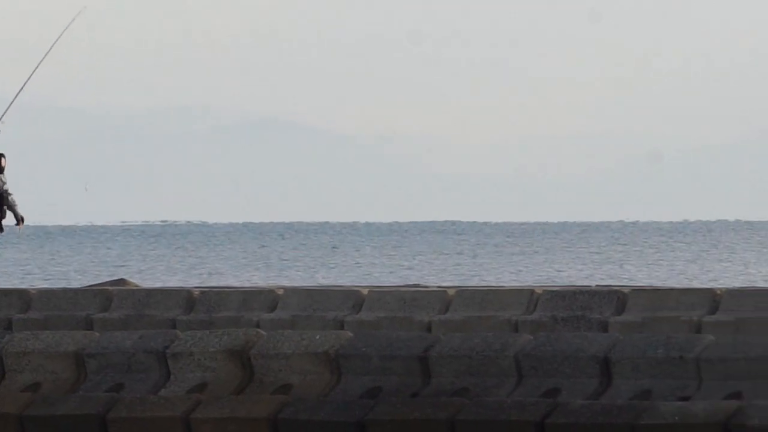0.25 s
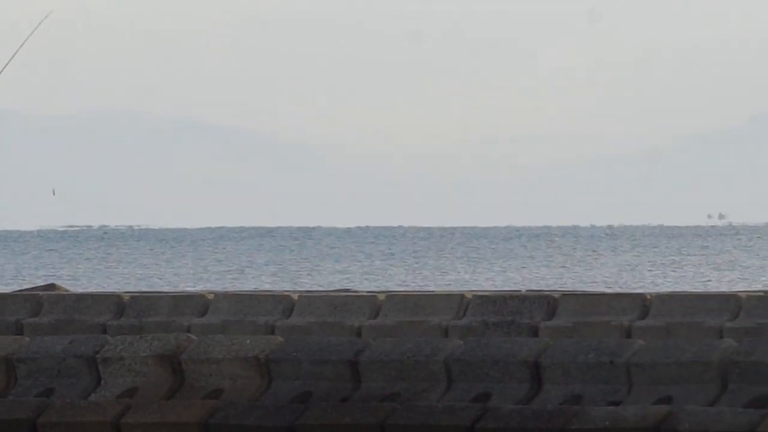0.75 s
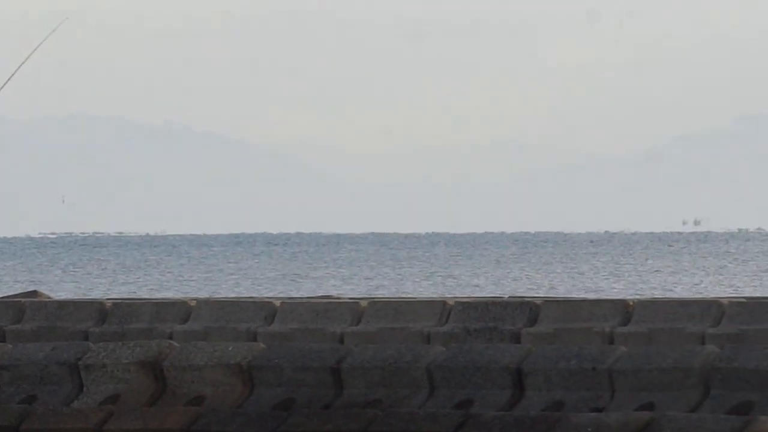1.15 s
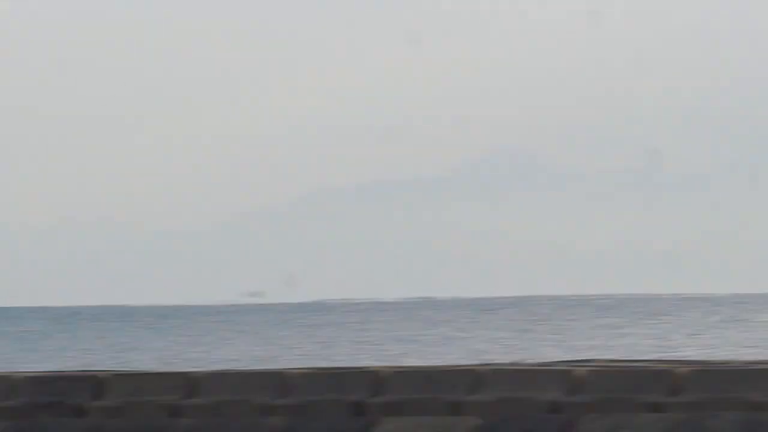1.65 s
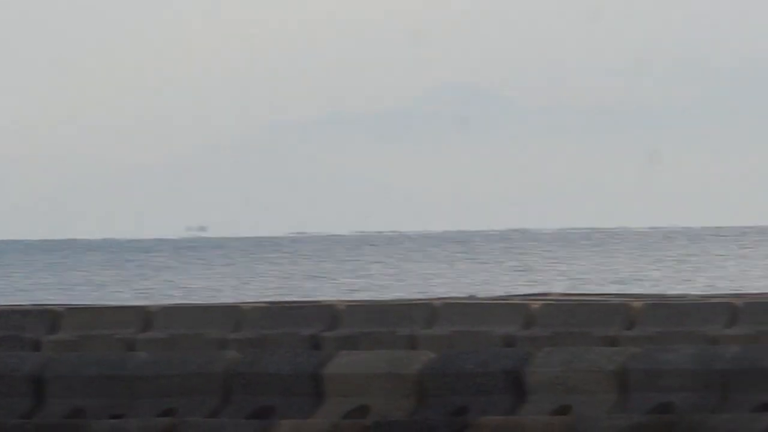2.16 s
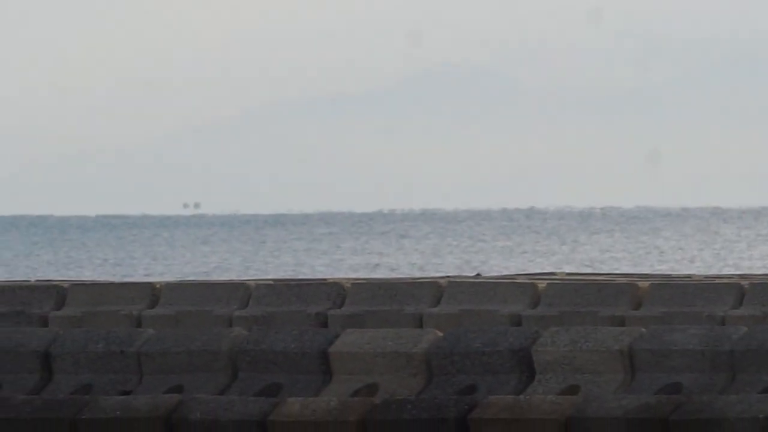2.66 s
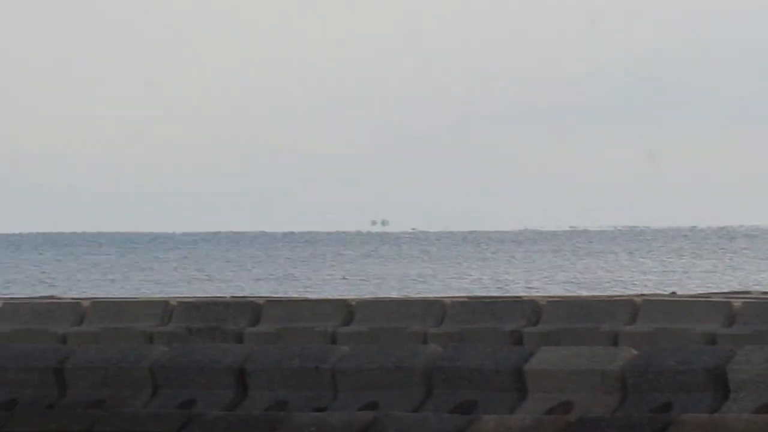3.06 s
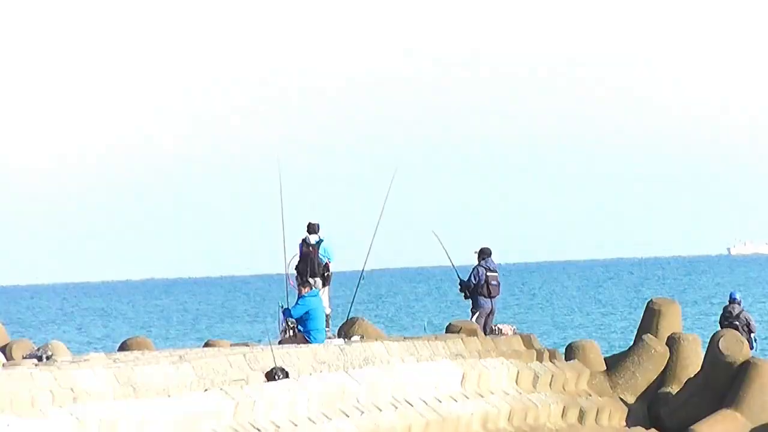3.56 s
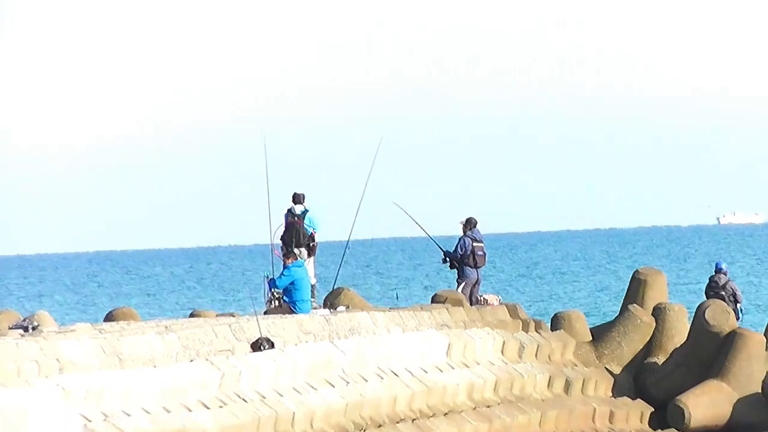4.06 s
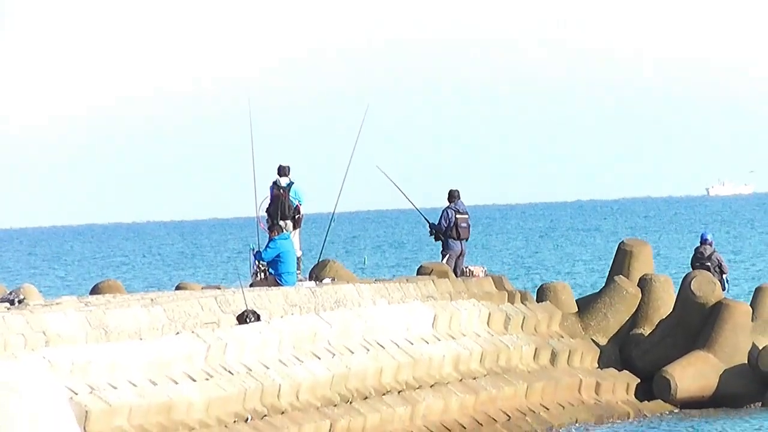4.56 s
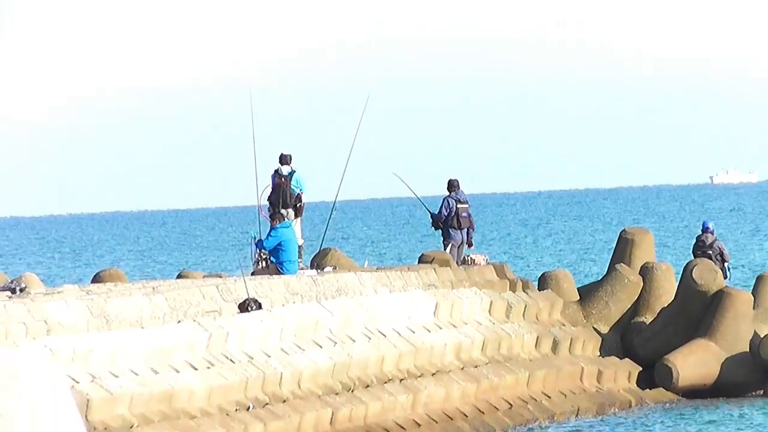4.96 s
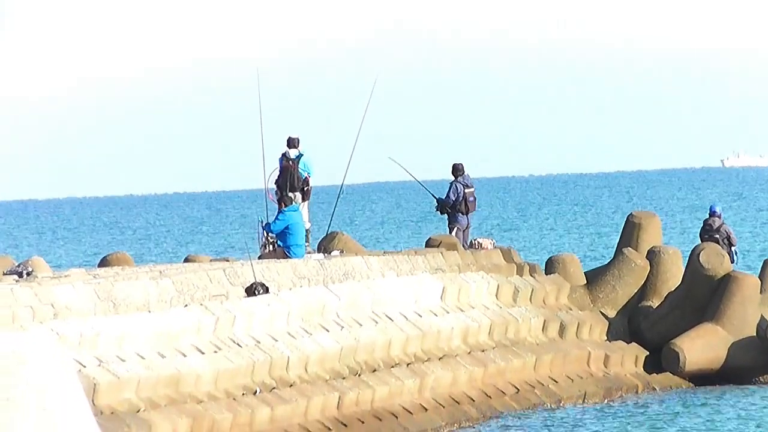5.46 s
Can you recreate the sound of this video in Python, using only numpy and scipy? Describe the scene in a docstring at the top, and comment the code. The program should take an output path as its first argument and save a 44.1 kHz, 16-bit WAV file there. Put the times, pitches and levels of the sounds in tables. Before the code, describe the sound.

Small sea waves slosh among the blocks of a concrete breakwater a few metres from the microphone, with hollow gulps, bubbling, fizzing foam and drops spattering on the concrete. The water shifts slightly to the right and grows fizzier. It cuts off into a brief silence, then the sea returns from farther off, straight ahead, as a softer, duller wash with faint gurgles.

```python
"""Small sea waves slosh among the blocks of a concrete breakwater, a few metres from the microphone.
Countless bubbles make the rush and bursting foam the fizz; trapped air gulps, flung drops crackle
on the concrete and hollows sing as they fill and drain. After a short silence the water is heard
from farther off: a softer, duller rush from straight ahead, with a thin fizz of foam."""
import sys
import numpy as np
from scipy import signal
from scipy.fft import rfft, irfft
from scipy.io import wavfile

SR = 44100
rng = np.random.default_rng(int(sys.argv[2]) if len(sys.argv) > 2 else 0)


def master(y):
    """Save y as 16-bit WAV."""
    cut = np.clip(np.atleast_2d(y).T, -1, 1)
    pcm = np.round(cut * 32767)  # scale
    wavfile.write(sys.argv[1], SR, pcm.astype(np.int16))


N = 251370
TIME = np.arange(N) / SR
CUTOFF_HZ = 11000
BANDS_PER_OCTAVE = 4
BAND_HZ = 25 * 2 ** (np.arange(30) / BANDS_PER_OCTAVE)


def from_db(db):
    """Decibels to gain."""
    return 10 ** (np.asarray(db) / 20)


def unit_rms(x):
    """Scale to unit rms."""
    return x / np.sqrt(np.mean(x ** 2) + 1e-20)


def in_time(rows):
    """Each column of a curve at every sample."""
    s, *columns = np.transpose(rows)
    return np.array([np.interp(TIME, s, c) for c in columns])


def at_hz(points, hz):
    """Read a table on a log-frequency axis."""
    point_hz, values = np.transpose(points)
    return np.interp(np.log(hz), np.log(point_hz), values)


def drift(rate):
    """A smooth random wander of unit rms, changing at about the given rate in Hz."""
    step, settle = 40, 2000
    pole = np.exp(-2 * np.pi * rate * step / SR)
    white = rng.standard_normal(N // step + settle + 2)
    slow = signal.lfilter([1], [1, -2 * pole, pole * pole], white)[settle:]
    return np.interp(np.arange(N) / step, np.arange(len(slow)), unit_rms(slow))


def pan(balance_db):
    """Left and right gains of constant power; balance is left over right."""
    gains = from_db(np.array([[.5], [-.5]]) * balance_db)
    return gains / np.sqrt(np.mean(gains ** 2, axis=0))


def add(out, s, sound, balance_db, lag_ms):
    """Place a short sound in stereo, reaching the left microphone lag_ms late."""
    for side, gain, start in zip(out, pan(balance_db), (s + lag_ms / 1000, s)):
        i = int(np.clip(start * SR, 0, N))
        side[i:i + len(sound)] += gain * sound[:N - i]


def dulled(x, top_hz):
    """Steep loss of treble."""
    return signal.sosfilt(signal.butter(8, min(top_hz, CUTOFF_HZ), fs=SR, output="sos"), x)


def wash(waves, lull):
    """Levels in dB of water and foam: each wave builds, froths abruptly as it breaks, then drains."""
    onset_s, foam_build, foam_drain = .008, 0.6, 1.07   # build and drain set the foam's steepness
    power = from_db(lull)[:, None] ** 2
    for crest, breaks, rise, fall, *crest_db in waves:
        early = np.maximum(crest - TIME, 0) / rise
        late = np.maximum(TIME - crest, 0) / fall
        unbroken = np.maximum(breaks - TIME, 0) / onset_s
        water = np.exp(-np.minimum(early ** 2 + late, 20))
        froth = np.exp(-np.minimum(unbroken + foam_build * early ** 4 + foam_drain * late, 20))
        shapes = np.array([water, water] + [froth] * (len(crest_db) - 2))
        power = power + (from_db(crest_db)[:, None] * shapes) ** 2
    return 10 * np.log10(power)


# The centres of slosh, rush and splash, in Hz.
WASH_HZ = [520, 1150, 2370]
def band_levels(slosh_db, rush_db, fizz_db, colour, level_db, usual_fizz_db):
    """Rms of each band in time: the water's colour, bent by slosh and rush; foam brightens the splash."""
    splash_db = 0.73 * rush_db + 0.16 * (fizz_db - usual_fizz_db)
    shares = np.array([np.interp(np.log(BAND_HZ), np.log(WASH_HZ), row) for row in np.eye(3)])
    swell = from_db(level_db + shares.T @ [slosh_db, rush_db, splash_db])
    steady = from_db(at_hz(colour, BAND_HZ)) * np.sqrt(BAND_HZ)
    return swell * (steady / np.linalg.norm(steady))[:, None]


def churn(levels, likeness, balance_db, slosh_lead_ms, rush_lag_ms,
          surge_db, patchy_db, surge_hz, patchy_hz):
    """Countless tiny bubbles merge into a rush that surges as a whole and in patches an octave wide."""
    out, white = np.zeros((2, N)), rng.standard_normal((2, 2, N))
    surge = surge_db * drift(surge_hz)
    for k, hz in enumerate(BAND_HZ):
        if k % BANDS_PER_OCTAVE == 0:
            shadow = hz / (hz + 180)   # low sound bends round the microphone to both sides alike
            lumps = unit_rms(from_db(surge + patchy_db * drift(patchy_hz))) * pan(shadow * balance_db)
        edges = hz * 2 ** (np.array([-.5, .5]) / BANDS_PER_OCTAVE)
        band = signal.butter(2, edges, "band", fs=SR, output="sos")
        mid, side = unit_rms(signal.sosfilt(band, white[k % 2]))
        alike = at_hz(likeness, hz)
        mid, side = mid * np.sqrt((1 + alike) / 2), side * np.sqrt((1 - alike) / 2)
        lead_ms = slosh_lead_ms if hz < 900 else -rush_lag_ms
        left = np.interp(TIME + lead_ms / 1000, TIME, mid + side)
        out += levels[k] * lumps * np.array([left, mid - side])
    return out


def bubble(hz, cycles, rise):
    """A pocket of air rings briefly, its pitch climbing as it nears the surface."""
    age = np.arange(int(6 * cycles / hz * SR)) * hz / (cycles * SR)   # in decay times
    swell = (1 - np.exp(-age / .22)) ** 2 * np.exp(-age)
    return swell / swell.max() * np.sin(2 * np.pi * cycles * (age + rise * age ** 2 / 2))


def bubbling(levels, level_db, spread_db, cycles, balance_db, scatter_db, lag_ms, count):
    """Single bubbles stand out of the rush, as strong as the wash is at their pitch; a few are louder."""
    out = np.zeros((2, N))
    for when, pitch, size, life, place in rng.random((count, 5)):
        i, hz = int(when * N), 230 * (3000 / 230) ** pitch
        strength = levels[np.argmin(abs(np.log(BAND_HZ / hz))), i]
        size_db = level_db + spread_db * min(-np.log(1 - size), 3)
        ring = strength * from_db(size_db) * bubble(hz, cycles * 2 ** (2 * life - 1), rise=0.053)
        # all start within the first second, with level and balance drawn from the whole wash
        add(out, when, ring, balance_db[i] + scatter_db * (2 * place - 1), 2 * place * lag_ms)
    return out


def foam(swell_db, colour, level_db, pops_per_s, spread_db, clump_db, side_db):
    """Foam fizzes as its tiny bubbles burst in clumps."""
    born = rng.random((2, N)) < pops_per_s / SR
    sizes = from_db(spread_db * np.minimum(rng.exponential(1, (2, N)), 4))
    pops = born * sizes * rng.choice([-1, 1], (2, N)) * from_db(clump_db * drift(26))
    hz = np.maximum(np.fft.rfftfreq(N, 1 / SR), 1)
    mid, side = irfft(rfft(pops) * from_db(at_hz(colour, hz)), N)
    side = side * from_db(side_db)
    return from_db(level_db + swell_db) * unit_rms(np.array([mid + side, mid - side]))


# Waves running into the blocks close by. Each row: crest, break, rise and fall in seconds,
# then relative levels of slosh, rush, fizz and spray at the crest in dB.
NEAR_WAVES = [(.2, 0.108, 0.066, 0.073, -1.5, 3, -67, -73), (.44, 0.42, 0.038, 0.089, 4.5, 1, -65, -72),
              (.59, .56, 0.053, 0.41, 5, -14, -85.5, -108), (.98, 0.99, 0.054, 1, 1.5, -6, -73.5, -108),
              (1.47, 1.45, 0.14, 0.14, 1.5, -1, -61, -91.5), (1.72, 1.55, 0.18, 0.76, 0.5, -1.5, -62, -90),
              (2.12, 2.08, 0.17, 0.62, -3.5, -3, -61.5, -84.5),
              (2.42, 2.21, 0.12, 0.15, -3.5, 1.5, -54.5, -65),
              (2.56, 2.525, 0.042, 0.16, -7, 3.5, -47.5, -60),
              (2.84, 2.87, 0.058, 0.28, -7.5, -0.5, -58.5, -95.5),
              (3.25, 2.98, 0.16, 0.28, -13, -1.5, -60.5, -78),
              (3.45, 3.41, 0.055, 0.4, -8, -6.5, -56, -70.5)]
# Between waves: the same four levels in dB.
NEAR_LULL = (-9, -3.5, -77, -114)
# Water, foam and fine spray at close range. Each row: frequency in Hz, relative density in dB.
NEAR_COLOUR = [(25, -29), (100, -24.5), (170, -16.5), (250, -13.5), (400, -5), (570, 0.5), (900, -4.5),
               (1250, -3), (1700, -8), (2500, -9), (3200, -16), (3800, -12.5)]
NEAR_FOAM_COLOUR = [(2600, -19.5), (3600, 2.5), (4100, 1.5), (4700, -2.5), (5300, -6), (6000, -30.5),
                    (7500, -41.5), (11000, -56)]
SPRAY_COLOUR = [(4500, -16.5), (5700, -1.5), (7400, -5), (8400, -17.5), (9500, -26.5), (10500, -47)]
# Stereo image beside the blocks. Each row: frequency in Hz, left-right likeness from 0 to 1.
NEAR_LIKENESS = [(60, 0.3), (300, 0.6), (600, 0.45), (1200, 0.9), (2200, 0.6), (3500, 0.72)]
# Where the water lies. Each row: time in seconds, balance in dB, slosh's lead at the left in ms.
BEARING = [(0, -2, 0.86), (.9, -2, 0.78), (1.3, -4.5, 0.89), (1.7, -3.5, 0.83), (2.1, -3.5, 0.24),
           (2.5, -5.5, 0.15), (3.5, -6, 0)]
RUSH_LAG_MS = 0.12   # the rush lies to the right and reaches the left microphone late
def near_water():
    """Waves work among the blocks a few metres from the microphone, moving over to the right."""
    slosh_db, rush_db, fizz_db, spray_db = wash(NEAR_WAVES, NEAR_LULL)
    levels = band_levels(slosh_db, rush_db, fizz_db, NEAR_COLOUR, level_db=-41.5, usual_fizz_db=-60.5)
    balance_db, slosh_lead_ms = in_time(BEARING)
    rush = churn(levels, NEAR_LIKENESS, balance_db, slosh_lead_ms, RUSH_LAG_MS,
                 surge_db=1.0, patchy_db=1.78, surge_hz=22, patchy_hz=120)
    bubbles = bubbling(levels, level_db=3.5, spread_db=2.0, cycles=1.93,
                       balance_db=balance_db, scatter_db=12.5, lag_ms=RUSH_LAG_MS, count=2000)
    fizz = foam(fizz_db, NEAR_FOAM_COLOUR, level_db=-6.0, pops_per_s=4100,
                spread_db=0.0, clump_db=3.0, side_db=3.0)
    spray = foam(spray_db, SPRAY_COLOUR, level_db=-2.0, pops_per_s=1600,
                 spread_db=0.5, clump_db=4.0, side_db=1.0)
    spray_pan = pan(15 + 2 * balance_db)   # flies up left of the wash and swings twice as far
    return dulled(rush + bubbles, top_hz=3270) + fizz + spray * spray_pan


# Large air pockets, close by and then far off. Each row: start in seconds, pitch in Hz, peak in dB,
# decay time in cycles, balance in dB, lead at the left microphone in ms.
GULPS = [(0.103, 636, -29, 1.1, 1, 0.7), (.135, 1500, -33.5, 4.3, -3, -0.063),
         (.183, 520, -34.5, 3, -10, 0.47), (.208, 760, -32, 4, -6, 0.41), (.217, 960, -34, 1.2, -3, .2),
         (0.2466, 2220, -30.5, 3.8, 3, 0.081), (.2762, 590, -26.5, 2.2, -7.5, 0.68),
         (.314, 634, -30.5, 2.2, -3, 0.4), (.43, 721, -30, 1.5, -2, 0.64), (0.466, 520, -25, 1.3, 4, 0.7),
         (.489, 637, -30.5, 2.4, -1, 0.37), (0.5727, 760, -24.5, 1.35, -6, 0.45),
         (0.5951, 670, -26, 1.1, 6.5, 0.69), (.6124, 1180, -38, 3.3, 1, -.08),
         (.624, 550, -31, 2.2, -4, 0.33), (.631, 1270, -39, 5.4, 0.5, 0.013),
         (.679, 1480, -44, 6, -4, -.07), (0.7017, 620, -31, 2.6, 3, 0.34), (0.7542, 535, -37, 1.4, 3, 0.33),
         (.793, 673, -36, 1.9, -2, 0.35), (0.8214, 690, -25, 1.07, -6, 0.38),
         (0.876, 1360, -48, 4, -4, -0.23), (.944, 625, -33, 1.6, -7, .49),
         (.968, 1375, -34, 2.4, -6, 0.038), (.995, 1270, -43, 6.4, -2.5, -0.12),
         (1.096, 1030, -42, 7.9, 0, 0.14), (1.118, 1260, -42, 5, -3, -.1), (1.133, 494, -40.5, 5, -6, 0.25),
         (1.445, 700, -34.5, 1.8, -10, 0.33), (1.461, 338, -39, 1.8, -8, .4),
         (1.51, 674, -32, 2.3, 9, 0.39), (1.736, 1070, -29.5, 1.9, -4, 0.22),
         (1.7995, 625, -31, 1.7, 5, 0.46), (1.826, 1040, -38, 4, -2, -0.16),
         (1.972, 1847, -36, 4.3, -8, 0.12), (2.104, 760, -39, 3.5, -4, 0.055),
         (2.491, 637, -31.5, 4.1, -6, -0.14), (2.563, 762, -31.5, 3.6, -5, 0),
         (2.718, 1150, -32.5, 3.2, -7, -0.02), (2.8122, 980, -37.5, 3.2, -7, -0.13),
         (3.266, 1010, -36.5, 3.1, -6, -.05), (4.019, 597, -41.5, 1.7, 0.5, 0),
         (4.371, 704, -42, 2.1, 0.5, 0.086), (4.653, 288, -52, 1.2, -2, 0), (4.711, 1060, -43, 3.1, 3, 0),
         (4.946, 726, -46, 1.9, 1, 0), (4.996, 725, -37, 1.5, 1, 0.091),
         (5.002, 500, -42.5, 1.9, -1, 0.052), (5.005, 264, -56.5, 1.6, 0, -0.076),
         (5.092, 464, -42, 0.92, 0, 0.046), (5.146, 596, -40, 2.7, 1, 0),
         (5.255, 570, -48, 3.2, 0.5, 0.033), (5.283, 367, -47, 1.6, -1, 0),
         (5.328, 230, -48.5, 1.3, 0.5, 0), (5.336, 790, -40, 2.7, 2, 0), (5.47, 512, -39, 2.5, -1, -0.022),
         (5.568, 636, -42, 3.3, 0, 0.12), (5.584, 680, -41, 3.3, -1, 0)]
def gulps():
    """Water closes over big pockets of air between the blocks."""
    out, rise_per_cycle = np.zeros((2, N)), 0.022
    for s, hz, peak_db, cycles, balance_db, lead_ms in GULPS:
        add(out, s, from_db(peak_db) * bubble(hz, cycles, rise_per_cycle * cycles), balance_db, -lead_ms)
    return out


# Drops landing on the breakwater, and at 3.7504 s a short sharp tick as the far scene begins. Each row: start
# in seconds, level in dB, length in seconds, # band bottom and top in Hz, balance in dB, lag at the left
# microphone in ms.
SPLATS = [(0.194, -67, 0.0064, 4500, 7050, 6, 0), (0.422, -72, 0.0082, 5500, 7600, 10, 0.0061),
          (0.527, -75, .005, 5000, 6900, 11, 0.024), (0.727, -83.5, 0.011, 4000, 5560, -3, 0.039),
          (1.026, -67, 0.0051, 4000, 5700, 10, 0.024), (1.397, -57, 0.016, 2400, 4230, 0, 0.045),
          (1.447, -50.5, 0.0027, 2600, 4200, -2, 0.057), (1.5066, -39, 0.014, 704, 3720, -2, 0.088),
          (1.5127, -38.5, 0.0034, 800, 4700, 12, 0.066), (1.518, -68, 0.046, 4480, 7500, 6, .05),
          (1.5367, -33, 0.0018, 1670, 5420, 14, 0.029), (1.736, -41.5, 0.0022, 1200, 3050, 9, 0.051),
          (1.7935, -70, .004, 5000, 7370, 7, 0.043), (2.433, -58, 0.0077, 3000, 6100, -10, 0.14),
          (2.46, -57.5, 0.013, 3000, 6560, -11, .12), (2.478, -45.5, 0.0077, 2820, 5770, -5, 0.13),
          (2.7178, -35, 0.0035, 700, 5260, -7, .095), (2.7562, -36, 0.0026, 700, 5760, -7, 0.071),
          (2.837, -41.5, 0.0035, 1840, 4900, -6, 0.15), (2.963, -60, 0.0039, 3850, 5540, -28, .12),
          (3.063, -43.5, 0.0027, 1280, 4100, -3, 0.045), (3.086, -36, 0.0024, 700, 3900, -2.5, 0.067),
          (3.4108, -56.5, 0.0019, 5250, 8500, -11, 0.091), (3.431, -31.5, 0.0019, 1910, 3140, -1, 0.063),
          (3.7504, -52, .0012, 3580, 5060, -1, 0.0032), (4.337, -71, 0.014, 4000, 5000, 2, 0),
          (4.656, -60.5, .005, 4050, 5200, -.5, 0), (4.723, -62.5, 0.0045, 4400, 5400, -1, 0),
          (5.07, -62.5, 0.0064, 4200, 5120, -1.5, 0), (5.369, -65.5, 0.03, 4180, 4850, 0, 0)]
def splats():
    """A flung drop bursts on the concrete in a brief crackle, and its droplets patter down after it."""
    out, age = np.zeros((2, N)), TIME[:SR // 20]
    patter = from_db(-24.5) * np.exp(-age / 0.0085)
    for s, level_db, length, low_hz, high_hz, balance_db, lag_ms in SPLATS:
        burst = rng.choice([-1, 1], len(age)) * (np.exp(-(age / length) ** 1.58) + patter)
        band = signal.butter(3, [low_hz, high_hz], "band", fs=SR, output="sos")
        crackle = dulled(signal.sosfilt(band, burst), top_hz=1.86 * high_hz)
        crackle = crackle / np.sqrt(np.sum(crackle ** 2) / (length * SR))
        add(out, s, from_db(level_db) * crackle, balance_db, lag_ms)
    return out


# Hollows near the microphone. Each row: start and length in seconds, first and last pitch in Hz,
# peak before the waver in dB, balance in dB.
BLOOPS = [(0.366, 0.036, 1003, 1230, -42.5, 1), (1.615, 0.041, 686, 1370, -37.5, -7.5),
          (1.69, 0.032, 1340, 1420, -47, 0.5), (1.715, 0.022, 1430, 1133, -47, 5)]
def bloops():
    """A hollow between the blocks sings unsteadily, rising as it fills and sinking as it drains."""
    out, waver = np.zeros((2, N)), from_db(2.5 * drift(120))
    for s, length, start_hz, end_hz, peak_db, balance_db in BLOOPS:
        progress = np.linspace(0, 1, int(length * SR))
        phase = 2 * np.pi * np.cumsum(start_hz * (end_hz / start_hz) ** progress) / SR
        swell = np.sqrt(progress * (1 - progress)) * (1 - progress / 2)
        note = swell / swell.max() * np.sin(phase) * waver[int(s * SR):][:len(progress)]
        add(out, s, from_db(peak_db) * note, balance_db, RUSH_LAG_MS)
    return out


# Waves from farther back. Each row: crest, break, rise and fall in seconds,
# then relative levels of slosh, rush and fizz at the crest in dB.
FAR_WAVES = [(3.76, 3.4, 0.063, 0.042, -12.5, -19, -72), (4.04, 4, 0.1, 0.15, -6.5, 1, -100),
             (4.35, 4.232, 0.13, 0.47, -4.5, -2, -72.5), (4.66, 4.33, 0.085, 0.16, -8, -1.5, -66.5),
             (4.79, 4.7, .04, 0.12, -3.5, -10, -69.5), (5, 3.3, 0.13, 0.18, 1, -2.5, -92),
             (5.13, 5.068, 0.068, 0.16, -10.5, -8.5, -69), (5.3, 5.2, 0.091, 0.094, 0.5, -7, -79),
             (5.39, 5.2, 0.028, .04, -9, -6, -74), (5.59, 6.2, 0.025, 0.016, 0, -14, -103)]
# Between waves: the same three levels in dB.
FAR_LULL = (-3.5, -1.3, -109)
# Water and foam at a distance. Each row: frequency in Hz, relative density in dB.
FAR_COLOUR = [(25, -29), (100, -24.5), (250, -9), (350, -8.5), (570, 1.5), (900, -2.5), (1600, -6),
              (2000, -10.5), (2500, -21), (3200, -30), (3800, -52)]
FAR_FOAM_COLOUR = [(3200, -23.5), (3900, -4), (4500, 4), (5200, -0.5), (6000, -21.5), (7300, -32.5),
                   (9000, -60.5)]
# An almost mono image. Each row: frequency in Hz, left-right likeness from 0 to 1.
FAR_LIKENESS = [(60, 0.92), (300, 0.95), (600, .98), (2000, .99)]
def far_water():
    """Distance blends the splashes and narrows them to straight ahead of the microphone."""
    slosh_db, rush_db, fizz_db = wash(FAR_WAVES, FAR_LULL)
    levels = band_levels(slosh_db, rush_db, fizz_db, FAR_COLOUR, level_db=-49.5, usual_fizz_db=-79.5)
    rush = churn(levels, FAR_LIKENESS, balance_db=0, slosh_lead_ms=0, rush_lag_ms=0,
                 surge_db=-0.5, patchy_db=1.62, surge_hz=18, patchy_hz=50)
    bubbles = bubbling(levels, level_db=0.5, spread_db=1.8, cycles=3,
                       balance_db=np.zeros(N), scatter_db=1.2, lag_ms=0, count=1500)
    fizz = foam(fizz_db, FAR_FOAM_COLOUR, level_db=-3.0, pops_per_s=1500,
                spread_db=-1.0, clump_db=2.5, side_db=-18)
    return dulled(rush + bubbles, top_hz=3000) + fizz


def scene():
    """Beside the blocks, a moment of silence, then from farther back."""
    near_end_s, far_start_s = 3.517, 3.744
    near_on = np.clip((near_end_s - TIME) / .004, 0, 1)
    far_on = np.clip((TIME - far_start_s) / .02, 0, 1)
    return near_on * near_water() + far_on * far_water() + gulps() + bloops() + splats()


def record(dry):
    """The top is cut steeply."""
    return signal.sosfilt(signal.ellip(8, .1, 70, CUTOFF_HZ, fs=SR, output="sos"), dry)


dry = scene()
out = record(dry)
master(out)
```